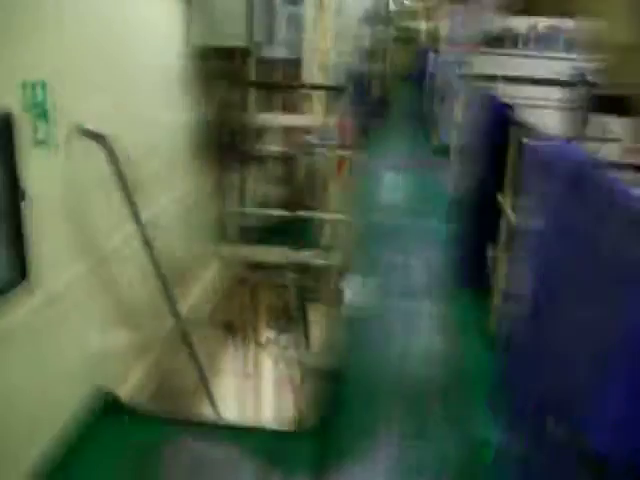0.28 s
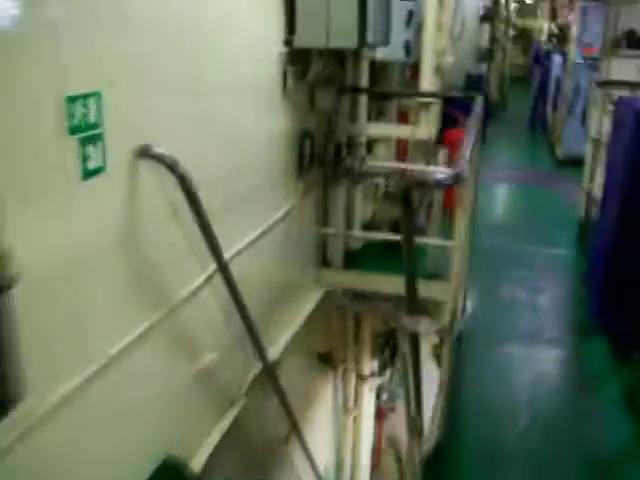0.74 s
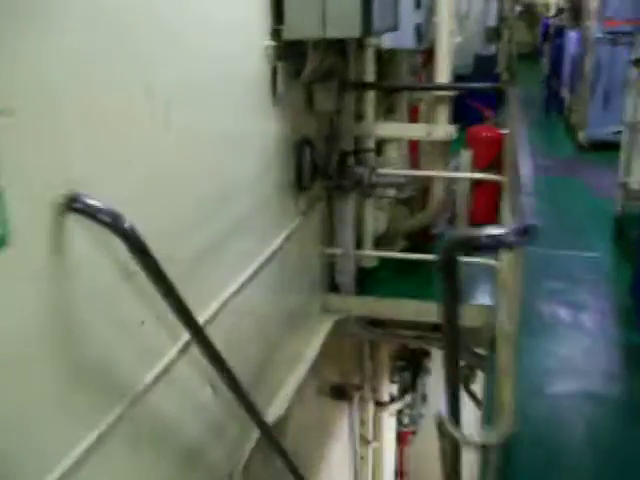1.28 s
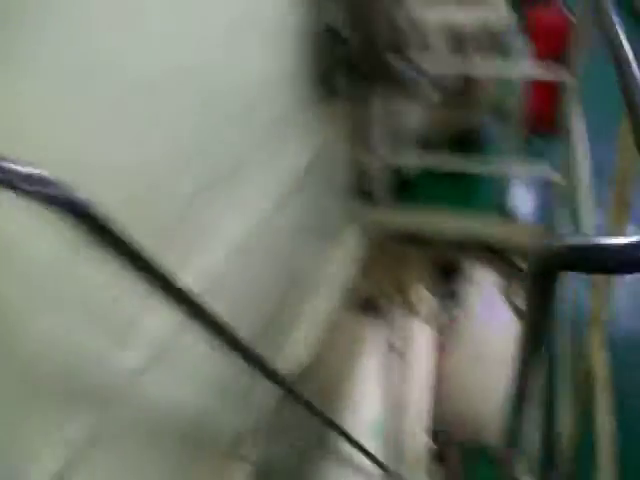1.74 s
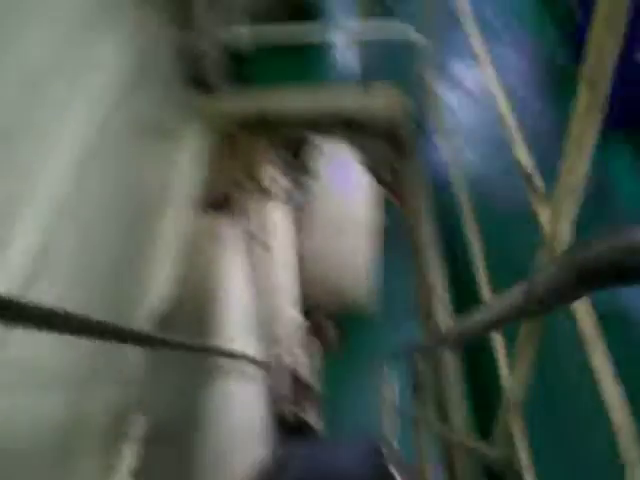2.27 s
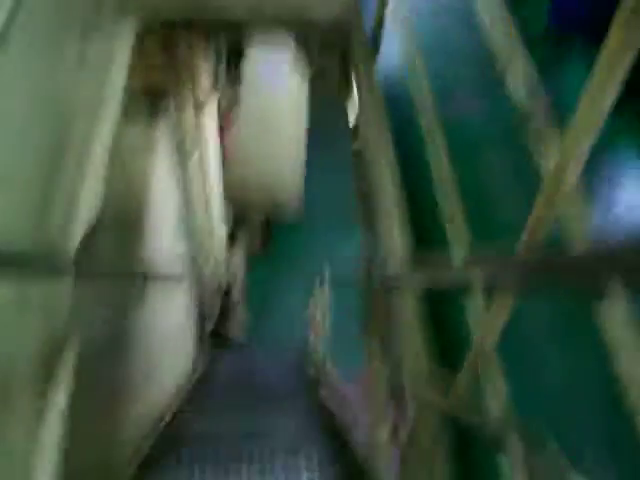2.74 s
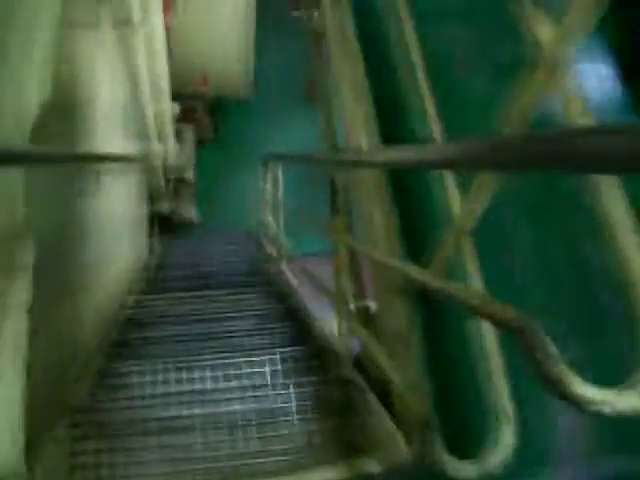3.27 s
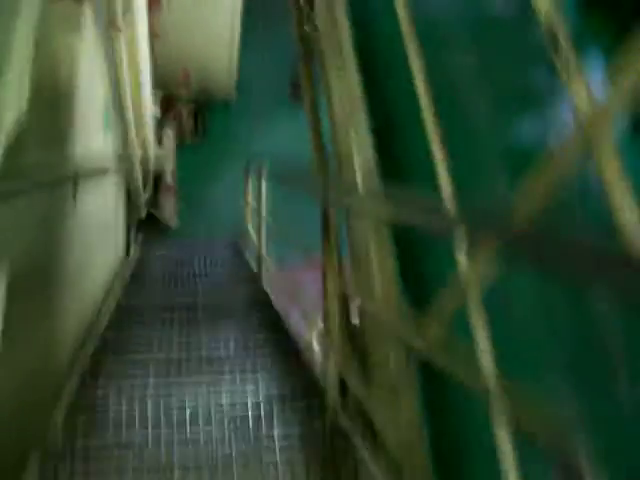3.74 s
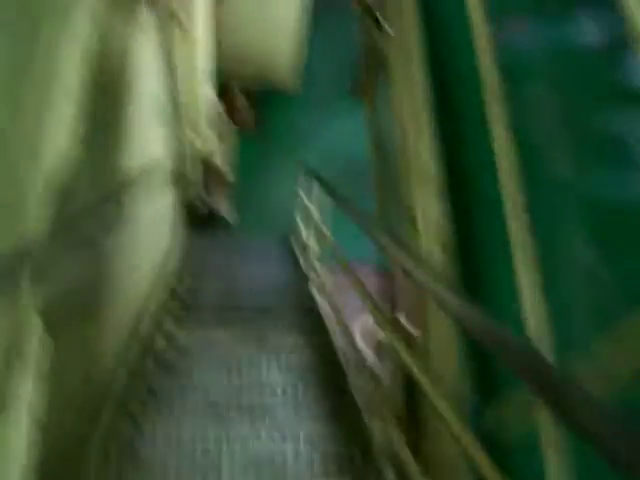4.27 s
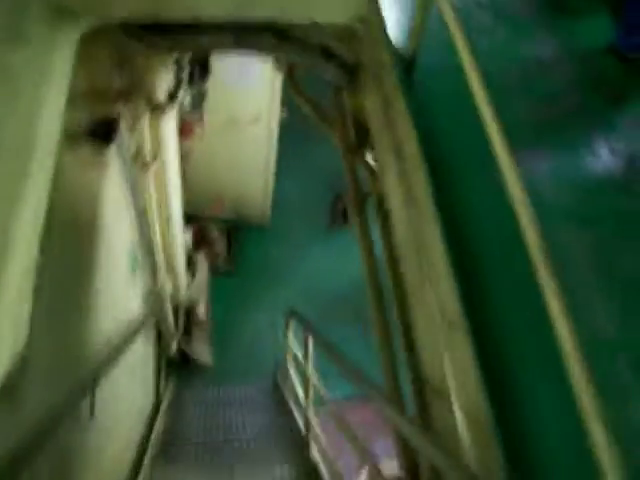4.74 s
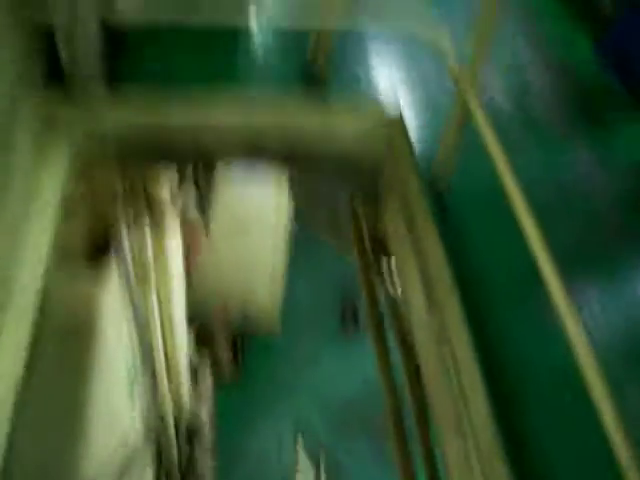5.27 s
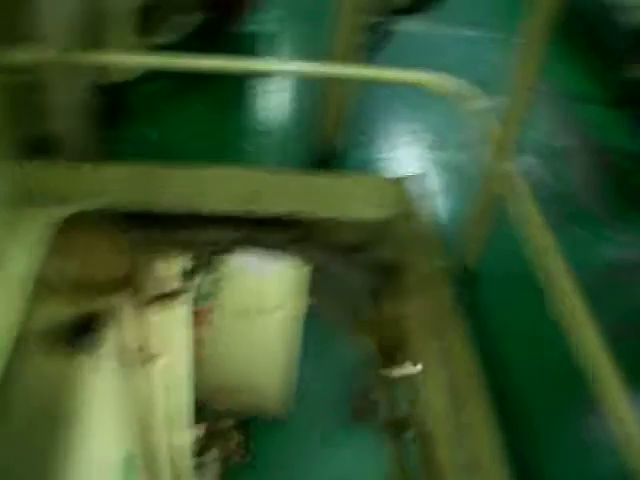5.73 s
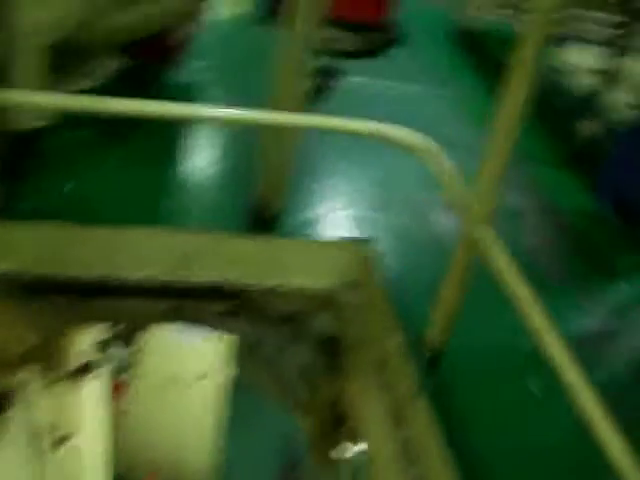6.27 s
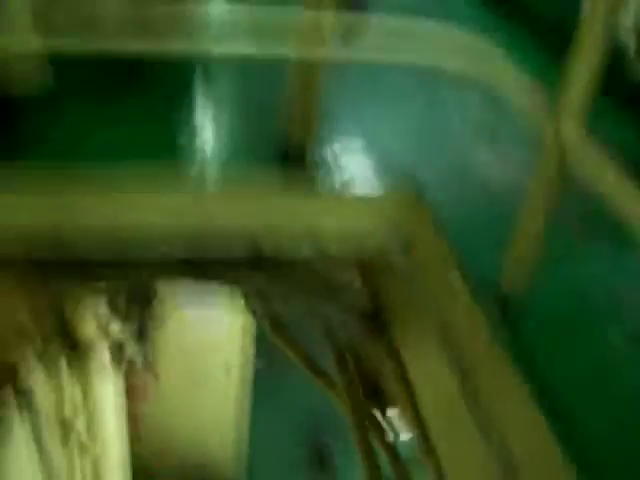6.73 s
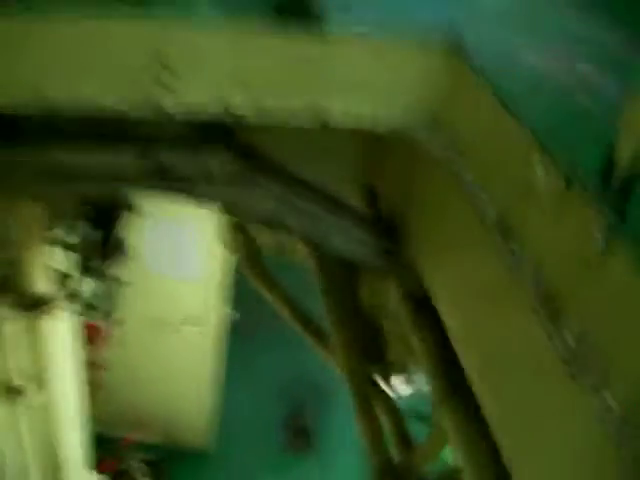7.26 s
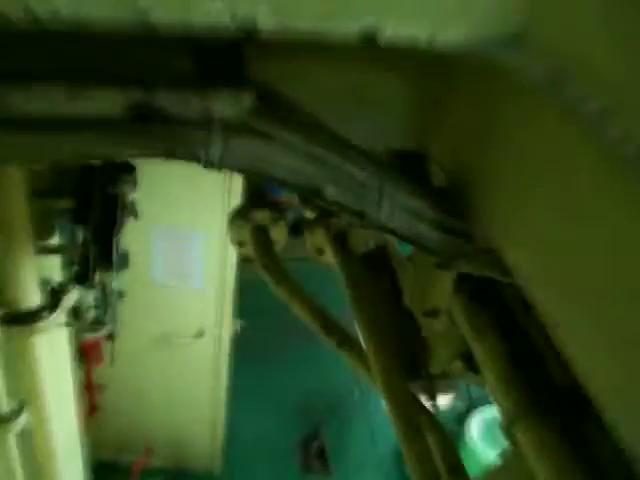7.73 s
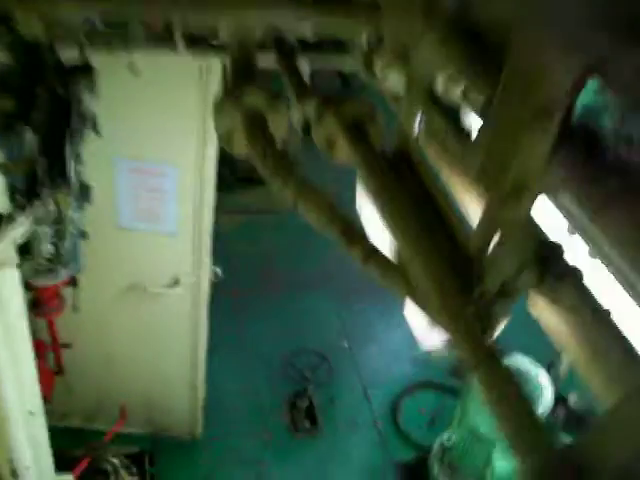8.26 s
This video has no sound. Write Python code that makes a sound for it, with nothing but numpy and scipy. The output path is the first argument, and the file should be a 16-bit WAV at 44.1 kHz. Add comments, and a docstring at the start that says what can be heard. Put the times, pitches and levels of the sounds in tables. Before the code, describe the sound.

Two big diesel engines roar and throb in a steel engine room, deep bass slowly swelling and fading under a wavering high turbocharger whine.

```python
"""In a ship's engine room, heard through a small camera walking to a stairwell, two six-cylinder diesels run.
They turn at nearly the same speed, so their deep firing tones (sine waves) beat: they swell and cancel.
Repeated random cycles make the engines' rattle, shaped noise the roar, tones and narrow noise the whines.
The loud bass drives the camera's fast gain control, and two pressure peaks overflow its converter."""
import sys
import numpy as np
from scipy import signal
from scipy.fft import rfft, irfft, next_fast_len
from scipy.io import wavfile
from scipy.ndimage import uniform_filter1d, map_coordinates

SR = 44100
rng = np.random.default_rng(int(sys.argv[2]) if len(sys.argv) > 2 else 0)


def invert_db(x):
    """Field ratio 10**(x/20) for x, a level in decibels (scalar or array-like)."""
    u = np.asarray(x, float) / 20
    return 10 ** u


def store_wav(level_fs):
    """Save 16-bit WAV to argv[1]."""
    pcm = np.round(np.clip(np.atleast_2d(level_fs), -1, 1) * 32767)
    wavfile.write(sys.argv[1], SR, pcm.T.astype(np.int16))


N = 374850  # length of the sound [samples]

# Working cycles a second of each engine: (far engine [Hz], near engine [Hz])
CYCLE_HZ = (3.986, 4.046)
FULL_SCALE = .715  # largest swing the camera can hold


def unit(x):
    """Scales a sound to an rms of 1."""
    return x / np.sqrt(np.mean(x ** 2) + 1e-20)


def along(points, hz):
    """Reads a curve of (frequency [Hz], value) points on a log frequency axis."""
    f, v = np.transpose(points)
    return np.interp(np.log(hz + 1), np.log(f + 1), v)


def curves(rows):
    """Gives one value per sample for each column after the time."""
    s, *columns = np.transpose(rows)
    t = np.arange(N) / SR
    return [np.interp(t, s, column) for column in columns]


def wobble(rate):
    """Draws a smooth random curve through `rate` random points a second."""
    knots = rng.standard_normal(int(N * rate / SR) + 4)
    return map_coordinates(knots, [np.arange(N) * rate / SR])


def filtered(x, response):
    """Multiplies the spectrum of x by a response that depends on frequency."""
    m = next_fast_len(N + SR // 2)
    spectrum = rfft(x, m) * response(np.fft.rfftfreq(m, 1 / SR))
    return irfft(spectrum, m)[:N]


def roar():
    """Machinery noise in a steel hall, in drifting patches, with sharp knocks of valves and injectors."""
    # Colour of noise and knocks, before the overall level is set: (frequency [Hz], relative level [dB])
    roar_colour = [(15, -8.5), (60, -7), (150, -8), (250, -11), (380, -9.5), (540, -10.5), (650, -14.5),
                   (800, -15), (1030, -23), (1300, -23.5), (1800, -33), (2450, -29.5), (3500, -30),
                   (4800, -39), (6200, -47)]
    patchy_db, knocks_per_s, level_db = 1.0, 150, -19.5
    z = signal.stft(rng.standard_normal(N), nperseg=512)[2]
    patches = uniform_filter1d(rng.standard_normal(z.shape), 6, 0)  # smooth over frequency
    patches = uniform_filter1d(patches, 10, 1)  # smooth over time
    noise = signal.istft(z * invert_db(patchy_db * unit(patches)), nperseg=512)[1][:N]
    knocks = (rng.random(N) < knocks_per_s / SR) * rng.uniform(0.075, 1, N)
    mixed = unit(noise) - .5 * unit(knocks)
    coloured = filtered(mixed, lambda hz: invert_db(along(roar_colour, hz)))
    return invert_db(level_db) * unit(coloured)


def rotor_whines():
    """Rotors, pumps and fans: blade tones that the room smears into narrow bands of noise."""
    # One band each: (centre frequency [Hz], width [Hz], level [dB rms])
    rotors = [(3182, 7, -43), (4860, 14, -57), (390, 4, -36), (790, 8, -42), (98.8, 1, -36),
              (111.3, .6, -39), (117.5, .6, -41), (148, 1, -40), (184, 2, -38), (215, 1, -39),
              (340, .5, -38), (2560, 90, -47)]
    total = np.zeros(N)
    for centre, width, level_db in rotors:
        noise = rng.standard_normal(N)
        band = filtered(noise, lambda f: np.exp(-((f - centre) / width) ** 2))
        total += invert_db(level_db) * unit(band)
    return total


def pump_hum():
    """A pump's hum that swells and fades: one sine wave whose pitch and loudness waver."""
    # Hum along the walk, before its wavering: (time [s], level [dB rms])
    pump_levels = [(0, -48), (.5, -31), (1.1, -42.5), (2.4, -33.5), (4.2, -44), (5.2, -43), (5.6, -33),
                   (6.3, -28), (6.8, -38), (8.5, -39.5)]
    pitch_hz = 546.5 + .8 * wobble(5)
    level_db = curves(pump_levels)[0] + 2.5 * wobble(6)
    tone = np.sqrt(2) * np.sin(2 * np.pi * np.cumsum(pitch_hz) / SR)
    return invert_db(level_db) * tone


def echoes(hz, width_hz):
    """A tone arriving by many shifting paths, a little off pitch: it swells and drops out at random."""
    a, b = [unit(filtered(rng.standard_normal(N), lambda f: np.exp(-(f / width_hz) ** 2))) for _ in "ab"]
    angle = 2 * np.pi * np.cumsum(hz) / SR
    return a * np.cos(angle) + b * np.sin(angle)


def turbo_whine():
    """The main turbocharger whine: a wavering tone heard straight, mixed with its echoes in the room."""
    # Whine along the walk: (time [s], level [dB rms])
    turbo_levels = [(0, -28.5), (.7, -23.5), (1.1, -25.5), (1.5, -27), (1.75, -23.5), (2.1, -31),
                    (2.5, -24.5), (2.8, -26), (3.1, -34.5), (3.45, -31), (3.95, -34), (4.3, -29.5),
                    (5.2, -30), (5.45, -26.5), (5.8, -33), (6.2, -28), (6.7, -31), (7.4, -32.5),
                    (8.05, -27), (8.5, -34)]
    # Middle pitch of the whine: (time [s], frequency [Hz])
    turbo_pitch = [(0, 3083), (.8, 3082), (1.6, 3088), (3, 3088), (4.6, 3085), (5.9, 3089), (7, 3085),
                   (8.5, 3086)]
    direct_db, skirt_db = -2, -5  # against the core of the echoes
    core_hz, skirt_hz = 8, 20  # width of the echoes' core and of their weaker skirt
    hz = curves(turbo_pitch)[0]
    direct = np.sqrt(2) * np.sin(2 * np.pi * np.cumsum(hz + 3 * wobble(12)) / SR)
    room = echoes(hz, core_hz) + invert_db(skirt_db) * echoes(hz, skirt_hz)
    return invert_db(curves(turbo_levels)[0]) * unit(invert_db(direct_db) * direct + room)


def repeated(cycle_hz, orders, db, size=4096):
    """One engine cycle with these order levels and random phases, played over and over."""
    lines = np.zeros(size // 2 + 1, complex)
    phases = np.exp(2j * np.pi * rng.random(len(orders)))
    lines[orders] = invert_db(db) * phases * size / np.sqrt(2)
    position = (np.arange(N) / SR * cycle_hz) % 1  # place within the cycle, 0 to 1
    return np.interp(position * size, np.arange(size), irfft(lines, size), period=size)


def engines():
    """Uneven cylinders give low cycle orders; the near block repeats its rattle every cycle."""
    # Low tones: (waves per cycle, far engine level [dB rms], near engine level [dB rms])
    low_orders = [(3, -44, -60), (5, -40, -35), (7, -39, -34), (8, -45, -35), (10, -45, -47),
                  (11, -37, -37), (12, -41, -38), (13, -37, -36), (16, -46, -50), (17, -40, -38),
                  (19, -42, -37), (20, -43, -46), (22, -60, -44), (23, -43, -43), (24, -51, -39),
                  (25, -55, -36), (26, -57, -37), (28, -46, -47)]
    # Near block, middle level of each order above 28 before a random spread: (frequency [Hz], level [dB])
    block_levels = [(110, -48), (200, -47), (400, -46), (560, -46), (640, -54), (1000, -62), (1500, -72)]
    far_hz, near_hz = CYCLE_HZ
    order, far_db, near_db = np.transpose(low_orders)
    order = order.astype(int)
    low = repeated(far_hz, order, far_db) + repeated(near_hz, order, near_db)
    high = np.arange(29, 360)
    high_db = along(block_levels, high * near_hz) + rng.normal(-1, 5, len(high))
    rattle = repeated(near_hz, high, high_db)
    return low + rattle * invert_db(0.8 * wobble(1.3))  # the rattle's loudness drifts


def firing():
    """The two firing tones swell and cancel every few seconds, their third harmonics once a second."""
    # Far engine, then near engine: (pressure crest in crank time [s], level [dB rms])
    firing_tones = [(.0032, -19.2), (.0297, -18.8)]
    # The near engine's governor hunts: (time [s], crank lag [s])
    governor_lag = [(0, .002), (1, .002), (2.5, 0), (8.5, 0)]
    # Third harmonics: (time [s], far engine level [dB rms], near engine level [dB rms])
    third_levels = [(0, -40, -30), (1.201, -39, -34.5), (2.199, -38, -37.5), (3.6, -26.5, -36),
                    (4.6, -34, -37), (5.498, -27.5, -35.5), (7.601, -25.5, -34.5), (8.5, -27.5, -35)]
    in_step_s = 6.62  # a moment when the two third harmonics swell together
    t = np.arange(N) / SR
    crank_times = (t, t - curves(governor_lag)[0])
    total = np.zeros(N)
    for cycle_hz, crank, (crest_s, db) in zip(CYCLE_HZ, crank_times, firing_tones):
        total += invert_db(db) * np.cos(2 * np.pi * 6 * cycle_hz * (crank - crest_s))  # six firings a cycle
    for cycle_hz, db in zip(CYCLE_HZ, curves(third_levels)):
        total += invert_db(db) * np.cos(2 * np.pi * 18 * cycle_hz * (t - in_step_s))
    return np.sqrt(2) * total


def scene():
    """Adds all sources; the walk changes the loudness, bass and treble of the engines and roar."""
    # The camera turns and leans over the stairwell:
    # (time [s], engines and roar gain [dB], bass gain [dB], treble gain [dB])
    walk = [(0, -2, -1.5, 5.5), (.7, -2, -2.5, 4), (1.4, -1.5, -2.5, 3.5), (2.1, -1, 1, 2.5),
            (2.8, -2, 0, 3), (3.3, 0, -0.5, 1.5), (3.9, -2, 1.5, 2), (4.6, -0.5, -2, 1), (5.3, -1, -1.5, 1),
            (6, -1.5, -1, 2), (6.7, -0.5, -1.5, 0), (7.4, 1, -3, 0), (8, -1, 3.5, 2), (8.5, 1.5, -2, -3)]
    engines_db, bass_db, treble_db = curves(walk)
    machines = roar() + engines()
    bass = filtered(machines, lambda hz: 1 / (1 + (hz / 170) ** 4))
    treble = filtered(machines, lambda hz: 1 / (1 + (900 / (hz + 1)) ** 4))
    machines = machines + (invert_db(bass_db) - 1) * bass + (invert_db(treble_db) - 1) * treble
    whines = rotor_whines() + pump_hum() + turbo_whine()
    return (whines + invert_db(engines_db) * machines + firing())[None]


def gain_control(x):
    """The gain drops a few ms after the bass swings out; the diaphragm is stiffer on the pressure side."""
    sense_hz, follow_s = 70, .0033  # bass limit; time constant of each of two smoothing steps
    depth, stiffness = 10, .45
    bass = filtered(x, lambda hz: 1 / (1 + (hz / sense_hz) ** 4))
    push = filtered(depth * bass ** 2, lambda hz: 1 / (1 + 2j * np.pi * hz * follow_s) ** 2)
    return x * invert_db(2.0) / (1 + push + stiffness * bass)


def overflow(x):
    """The converter flattens the deepest swings; at two set moments a crest wraps to the negative end."""
    # The wrapped crests: (time [s], time past full scale [s], width of the peak [s])
    wrapped_crests = [(.51543, .0001, .0004), (3.93313, .00011, .0011)]
    x = x + .7 * np.minimum(x, 0) ** 3  # deep troughs swing further than crests
    y = x / (1 + np.abs(x / FULL_SCALE) ** 14) ** (1 / 14)
    t = np.arange(N) / SR
    for crest_s, wrap_s, width_s in wrapped_crests:
        away = np.abs(t - crest_s)
        crest = np.exp(-away / width_s)
        peaked = y * (1 - crest) + 1.2 * FULL_SCALE * crest
        y = np.where(away < wrap_s / 2, -1.1 * FULL_SCALE, peaked)
    return y


def low_pass(x):
    """Removes everything above the highest recorded frequency."""
    return signal.sosfilt(signal.butter(12, 15800, fs=SR, output="sos"), x)


def record(dry):
    """The camera: gain control, converter overflow, a steep band limit, then hard clipping."""
    x = overflow(gain_control(dry[0]))
    # weakens the lowest bass below about 3 Hz and cuts the treble around 5730 Hz
    x = filtered(x, lambda hz: hz / (hz + 3) * (.5 - .5 * np.tanh((hz - 5730) / 250)))
    finished = np.clip(x, -FULL_SCALE, FULL_SCALE)[None]
    return low_pass(finished)


dry = scene()
out = record(dry)
store_wav(out)
```